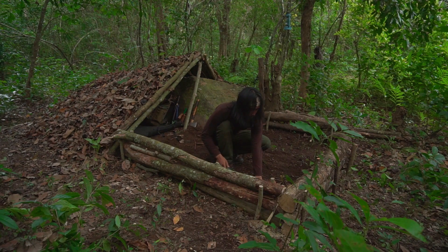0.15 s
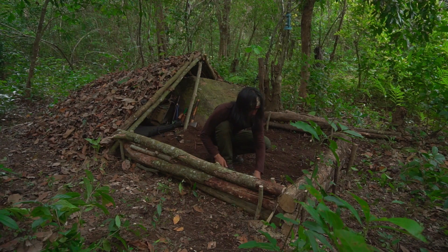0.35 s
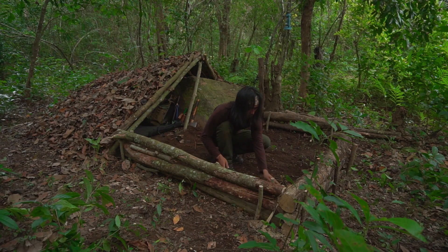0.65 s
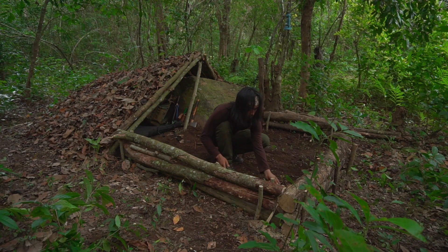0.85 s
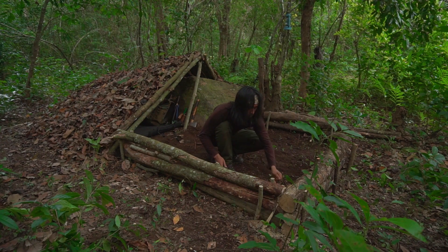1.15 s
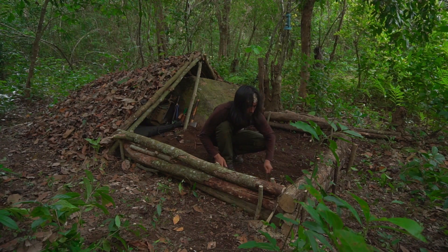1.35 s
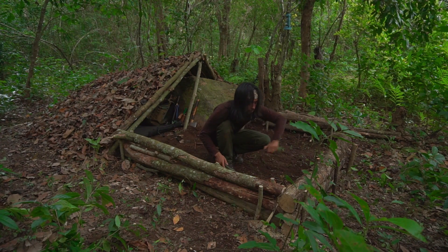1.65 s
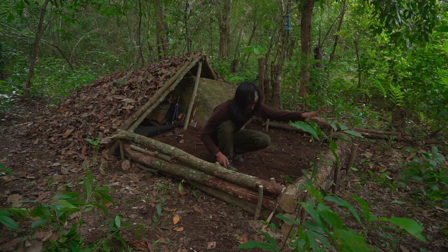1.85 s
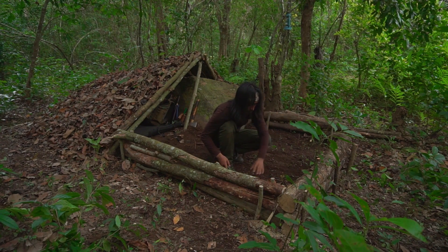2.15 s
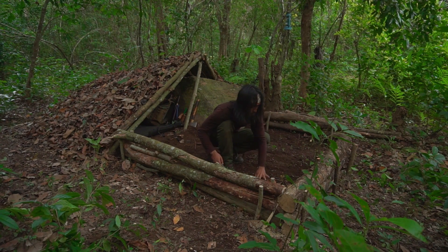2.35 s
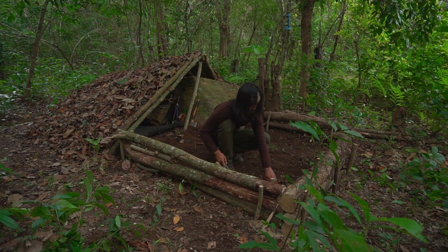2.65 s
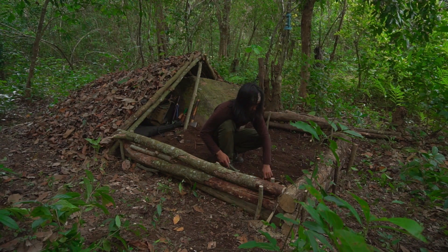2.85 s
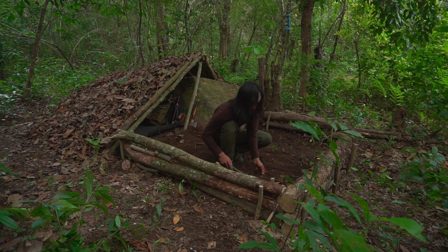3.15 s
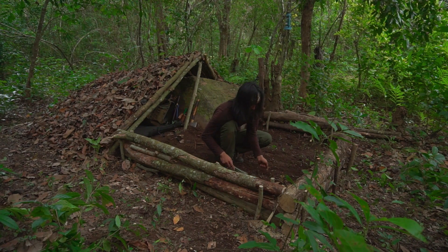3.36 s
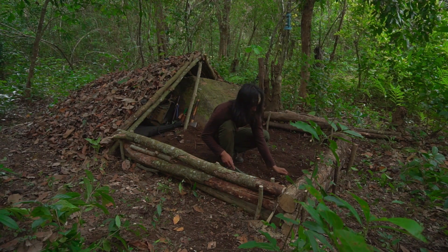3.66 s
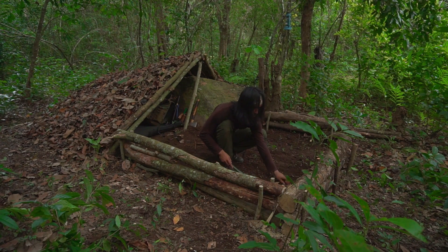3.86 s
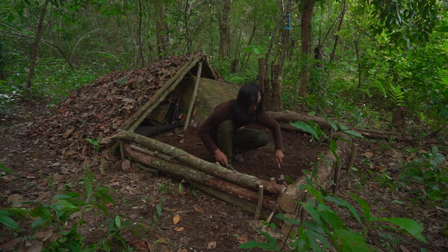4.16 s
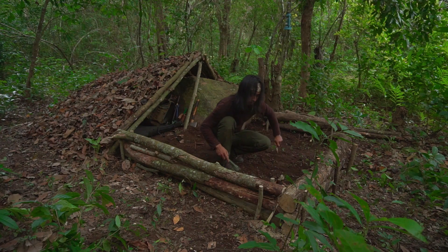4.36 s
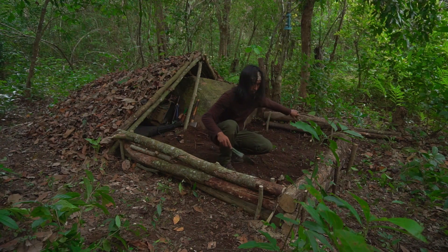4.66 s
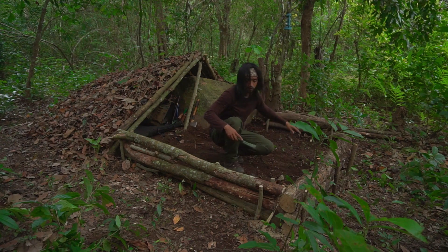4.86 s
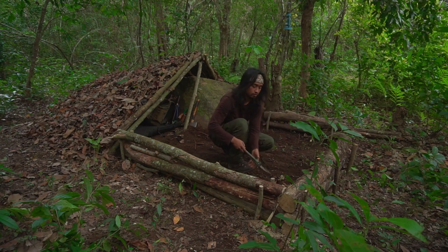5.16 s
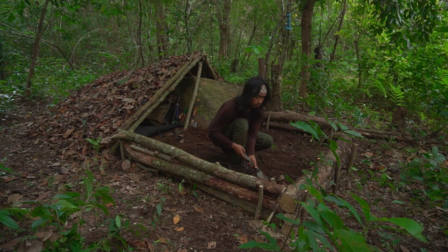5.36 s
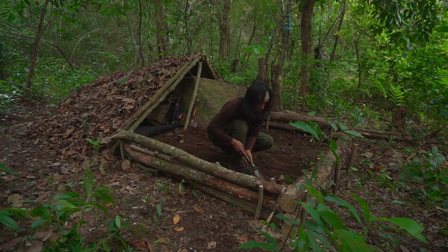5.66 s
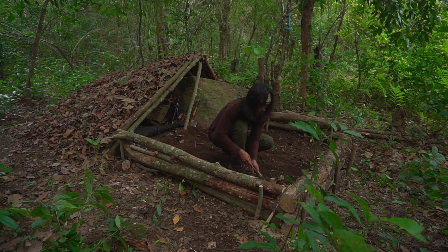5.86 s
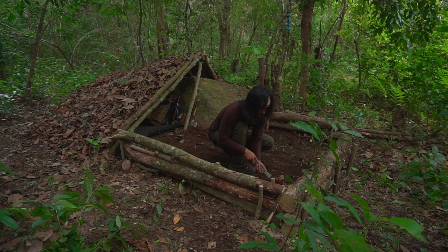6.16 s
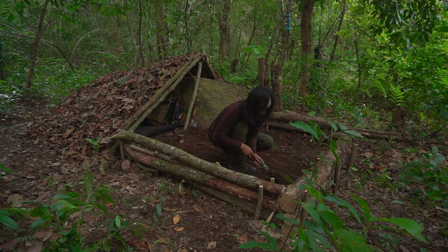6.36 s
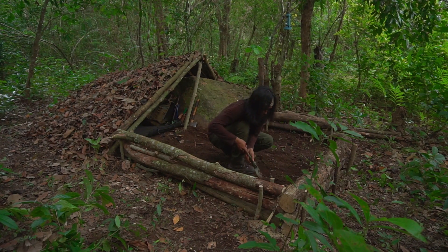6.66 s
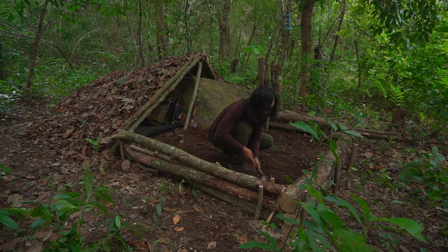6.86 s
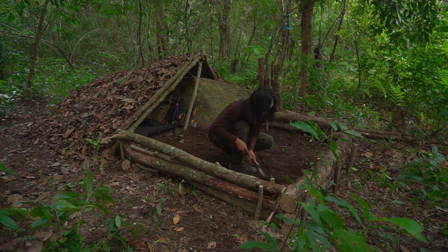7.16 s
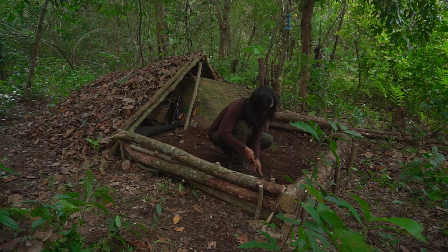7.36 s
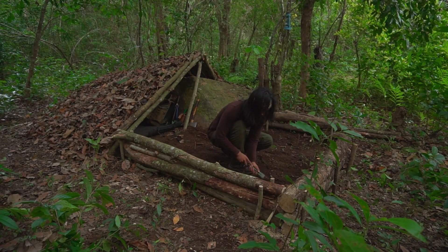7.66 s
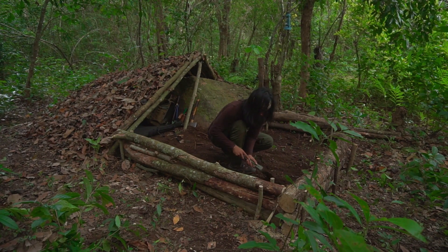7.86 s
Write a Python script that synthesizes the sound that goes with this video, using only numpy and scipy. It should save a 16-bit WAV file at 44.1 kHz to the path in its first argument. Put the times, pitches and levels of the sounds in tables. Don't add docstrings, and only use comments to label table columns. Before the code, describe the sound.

Tropical forest insects trill and a tree frog pulses over a soft stream hiss while hands rustle litter, snap twigs and chop at a root.

```python
import sys
import numpy as np
from scipy import signal
from scipy.fft import rfft, irfft, next_fast_len
from scipy.io import wavfile
from scipy.ndimage import uniform_filter1d

SR = 44100
rng = np.random.default_rng(int(sys.argv[2]) if len(sys.argv) > 2 else 0)


def natural_amplitude(level_db):
    exponent = np.asarray(level_db, float) / 20
    return 10 ** exponent


def wav_record(signal):
    frames = np.transpose(np.atleast_2d(signal))
    bounded = np.clip(frames, -1, 1)
    quanta = np.round(bounded * 32767).astype(np.int16)
    wavfile.write(sys.argv[1], SR, quanta)


N = 353241


def unit(x):
    return x / np.sqrt(np.mean(x ** 2) + 1e-20)


def along(points, hz):
    f, v = np.transpose(points)
    return np.interp(np.log(hz + 1), np.log(f + 1), v)


def curves(rows):
    s, *cols = np.transpose(rows)
    return [np.interp(np.arange(N) / SR, s, c) for c in cols]


def filtered(x, response):
    m = next_fast_len(x.shape[-1] + 8192)
    return irfft(rfft(x, m) * response(np.fft.rfftfreq(m, 1 / SR)), m)[..., :x.shape[-1]]


def resonance(hz, width):
    return lambda f: 1j * f * width / (hz * hz - f * f + 1j * f * width)


def add(track, s, sound):
    start = max(round(s * SR), 0)
    part = track[..., start:start + sound.shape[-1]]
    part += sound[..., :part.shape[-1]]


def notes(s, length, from_hz, to_hz, db, swell, pan_db=0):
    t = np.arange(round(np.max(length) * SR)) / SR
    s, length, from_hz, to_hz, db = (np.reshape(v, (-1, 1)) for v in (s, length, from_hz, to_hz, db))
    u = np.minimum(t / length, 1)
    turns = from_hz * t + (to_hz - from_hz) * t * u / 2 + rng.random(s.shape)
    envelope = np.abs(np.sin(np.pi * u)) ** swell
    wave = natural_amplitude(db + 3) * envelope * np.sin(2 * np.pi * turns)
    at = np.clip(np.round(s * SR).astype(int) + np.arange(len(t)), 0, N)
    sides = (.5, -.5) if np.any(pan_db) else (0,)
    ears = [wave * natural_amplitude(side * np.reshape(pan_db, (-1, 1))) for side in sides]
    return np.array([np.bincount(at.ravel(), ear.ravel(), N + 1)[:N] for ear in ears])


def roughened(x, hz, share):
    flutter = unit(filtered(rng.standard_normal(x.shape), lambda f: 1 / (1 + (f / hz) ** 4)))
    share = np.clip(share, 0, 1)
    return np.sqrt(1 - share) * x + np.sqrt(share) * x * flutter


def rasp(length, hz, width, db, beat, grain_db):
    t = np.arange(round(length * SR)) / SR
    grains = rng.standard_normal(len(t)) * natural_amplitude(grain_db * rng.exponential(size=len(t)))
    teeth = grains * (1 + beat * np.sin(2 * np.pi * 90 * t))
    ring = resonance(hz, width)
    envelope = np.abs(np.sin(np.pi * t / length)) ** 0.45
    return natural_amplitude(db) * unit(filtered(teeth, lambda f: ring(f) ** 2)) * envelope


def snap(db, hz, treble_db, t60_ms, width):
    t = np.arange(SR // 25) / SR
    crack = rng.standard_normal((2, len(t))) * natural_amplitude(-60000 * t / np.clip(t60_ms, 1, 40))
    crack[:, 0] = 4.4
    body, spit = resonance(hz, max(width, 200)), resonance(8600, 6500)
    low = filtered(crack[0], lambda f: body(f) ** 2)
    high = filtered(crack[1], lambda f: spit(f) ** 2)
    return natural_amplitude(db - 2.0) * (low / np.abs(low).max() + natural_amplitude(treble_db + 5.0) * high / np.abs(high).max())


def snap_track(events):
    out = np.zeros(N)
    for s, *sound in events:
        add(out, s + .0006, snap(*sound))
    return out


def trees(x, t60, wet_db):
    t, hop = np.arange(SR // 4) / SR, SR // 4
    out, fade = np.zeros((2, N)), np.hanning(2 * hop)
    padded = np.pad(x, ((0, 0), (hop, 2 * hop)))
    for start in range(-hop, N, hop):
        piece = padded[:, start + hop:start + 3 * hop] * fade
        tail = rng.standard_normal((2, len(t))) * natural_amplitude(-60 * t / t60) * np.minimum(t / 0.0014, 1)
        wet = signal.fftconvolve(piece, tail / np.linalg.norm(tail[0]), axes=1)
        add(out, start / SR, wet[:, max(-start, 0):])
    return x + natural_amplitude(wet_db) * out


# frequency in Hz, level in dB per Hz.
STREAM_SPECTRUM = [(25, -53), (100, -33), (186, -24), (490, -5.5), (815, -3.5), (1500, -3), (2250, -4),
                   (3500, -10.5), (5350, -14), (6900, -16.5), (10900, -23), (13700, -43), (14050, -1.5),
                   (14400, -37)]
# frequency in Hz, left-right likeness from -1 to 1.
STREAM_LIKENESS = [(60, 0.49), (500, 0.6), (1500, 0.61), (4300, 0.45), (5500, 0.13), (8400, 0.14),
                   (10800, 0.17)]


def stream():
    z = signal.stft(rng.standard_normal((2, N)), nperseg=512)[2]
    patches = uniform_filter1d(rng.standard_normal(z.shape[1:]), size=6, axis=0)
    patches = uniform_filter1d(patches, size=14, axis=1)
    pair = signal.istft(z * natural_amplitude(0.75 * unit(patches)), nperseg=512)[1][:, :N]

    def mid_side(hz):
        turn = np.arccos(np.clip(along(STREAM_LIKENESS, hz), -1, 1)) / 2
        return natural_amplitude(along(STREAM_SPECTRUM, hz)) * [np.cos(turn), np.sin(turn)]

    mid, side = filtered(pair, mid_side)
    return natural_amplitude(-41) * unit(np.array([mid + side, mid - side]))


# middle as share of the cycle, length in seconds, start and end in Hz,
# level in dB.
WING_STROKES = [
    (0, 0.014, 6253, 6198, 2),
    (0.43, 0.011, 6143, 6170, 1.5),
    (0.74, 0.009, 6120, 6135, -5.5),
]
# time in seconds, cycles behind a steady beat.
WING_DRIFT = [(0, 0), (.5, -.03), (1.2, -.09), (1.28, .12), (1.7, .06), (2.2, .12), (3, .1), (3.6, -.03),
              (4.02, -.13), (4.1, .12), (4.6, 0), (4.85, -.03), (5.2, .1), (5.7, .3), (6.4, .48),
              (8.02, .9)]


def near_cricket(level_db):
    wing_rate, left_lead_s = 28.3, .0062
    behind, = curves(WING_DRIFT)
    beats = np.flatnonzero(np.diff(np.floor(wing_rate * np.arange(N) / SR - behind))) / SR
    song = np.zeros((1, N))
    for share, length, from_hz, to_hz, db in WING_STROKES:
        chance = rng.standard_normal((len(beats), 3))
        detune = 20 * chance[:, 0]
        start = beats + share / wing_rate - length / 2 + .0006 * chance[:, 1]
        song += notes(start, length + 0 * beats, from_hz + detune, to_hz + detune,
                      db + .9 * chance[:, 2], swell=1.1)
    song = natural_amplitude(level_db + 3) * unit(song[0])
    left = natural_amplitude(-4.5) * np.roll(song, -round(left_lead_s * SR))
    return trees(np.array([left, song]), 0.076, -5.5)


def crowd(hz, spread_hz, length, fall_hz):
    when, chance = rng.random((2, 4000)) * N / SR, rng.standard_normal((2, 2, 4000))
    pitch = hz + spread_hz * chance[0]
    ears = [notes(when[ear], length + 0 * when[ear], pitch[ear] + fall_hz / 2, pitch[ear] - fall_hz / 2,
                  1.5 * chance[1, ear], swell=1.8)[0] for ear in range(2)]
    return unit(np.array(ears))


# pitch in Hz, spread in Hz, stroke in seconds, fall in Hz.
FAR_CRICKETS = [
    (6180, 62, .016, 56),
    (6130, 190, .012, 56),
    (5720, 56, 0.023, 8),
]


def far_chorus(level_db):
    kin, strays, low_kind = (crowd(*kind) for kind in FAR_CRICKETS)
    far = natural_amplitude(level_db + 0.5) * kin + natural_amplitude(0.55 * level_db - 21.5) * strays + natural_amplitude(-60.0) * low_kind
    return far * natural_amplitude([[1], [-1.5]])


# time in seconds, near level in dB, far chorus level in dB.
CRICKET_LEVELS = [(0, -47, -45), (.5, -43.5, -46.5), (1, -43, -48.5), (1.5, -43, -45.5), (2, -44.5, -45.5),
                  (2.5, -43.5, -45), (3, -44, -46), (3.5, -45, -47.5), (4, -45, -47.5), (4.5, -44, -46),
                  (5, -43.5, -44), (5.5, -45, -47), (6, -45, -47.5), (6.6, -50, -43), (6.9, -57, -44),
                  (7.4, -60, -44.5), (8.02, -62, -39.5)]


def crickets():
    near_db, far_db = curves(CRICKET_LEVELS)
    return near_cricket(near_db) + far_chorus(far_db)


# start in seconds, length in seconds, centre in Hz, width in Hz, level in dB.
KATYDID_BUZZES = [
    (0, 0.1, 4800, 500, -49.5),
    (0.802, 0.13, 5030, 900, -49),
    (1.04, 0.12, 5020, 600, -49.5),
    (1.3, .08, 4900, 600, -52),
    (1.565, 0.35, 5050, 1100, -48.5),
    (3.328, .015, 4370, 800, -42),
    (4.57, 0.27, 4660, 1500, -48.5),
    (6.116, 0.15, 5060, 1100, -49.5),
]


def katydid():
    out = np.zeros(N)
    for s, *sound in KATYDID_BUZZES:
        add(out, s, rasp(*sound, beat=.24, grain_db=0))
    return out


# level in dB, one a beat.
PEEP_LEVELS = [-48, -50, -46, -52, -49, -58, -52, -49, -53, -51, -52, -53]
# start in seconds, length in seconds, pitch in Hz, level in dB.
LEVEL_NOTES = [(.077, 0.059, 7050, -52), (0.722, .09, 7070, -54), (6.743, .045, 7080, -51),
               (6.86, .045, 7050, -51), (7.99, .03, 7100, -56), (3.811, 0.066, 6700, -54),
               (4.465, .07, 6665, -59), (5.14, .082, 6710, -53), (5.78, 0.12, 6665, -59),
               (6.45, .058, 6670, -53), (6.569, .043, 6700, -56), (7.168, 0.043, 6725, -52),
               (7.272, 0.039, 6755, -43), (7.823, 0.044, 6750, -52), (7.869, .05, 6755, -43),
               (7.92, .05, 6745, -50), (7.84, .025, 7950, -56)]


def whistling_insects():
    beat = .004 + .6818 * np.arange(len(PEEP_LEVELS))
    peeps = notes(beat, 0.0485, 7230, 6920, PEEP_LEVELS, swell=0.55)
    s, length, hz, db = np.transpose(LEVEL_NOTES)
    sag_hz = 30
    return peeps + notes(s, length, hz + sag_hz / 2, hz - sag_hz / 2, db, swell=0.52, pan_db=-6)


# first and last croak in seconds, first and last level in dB.
CROAK_TRAINS = [
    (0.02, 0.606, -39, -38),
    (2.61, 3.3, -39.5, -37.5),
    (4.783, 5.198, -41, -38),
    (6.122, 6.187, -37, -40),
    (6.251, 7.019, -39.5, -39.5),
]
# lag in seconds, length in seconds, start and end in Hz, level in dB.
CROAK_PARTS = [
    (0, .016, 4020, 4050, -17),
    (.011, .02, 4150, 3980, -9),
    (.01, .04, 3760, 3780, -12),
    (.018, .024, 3980, 3820, -13.5),
    (.032, .022, 4080, 3960, -14.5),
    (.04, .022, 3820, 3700, -17),
    (.055, .025, 4000, 4040, -26),
]


def tree_frog():
    starts, levels = [], []
    for first, last, first_db, last_db in CROAK_TRAINS:
        count = round((last - first) / .085) + 1
        starts.append(np.linspace(first, last, count))
        levels.append(np.linspace(first_db, last_db, count))
    s, db = np.hstack(starts), np.hstack(levels)
    chance = rng.standard_normal((len(s), 2))
    s, db = s + .002 * chance[:, 0], db + .5 * chance[:, 1]
    frog = np.zeros((2, N))
    for lag, length, from_hz, to_hz, part_db in CROAK_PARTS:
        detune = rng.normal(0, 25.0, len(s))
        frog += notes(s - .008 + lag, length + 0 * s, from_hz + detune, to_hz + detune,
                      db + part_db, swell=0.34)
    return roughened(frog, 220, .25)


# start in seconds, length in seconds, start
# and end in Hz, level in dB.
HOARSE_NOTES = [(1.574, .018, 4400, 3850, -47), (1.582, .1, 3880, 4010, -49),
                (1.707, .018, 4600, 3860, -48.5), (1.72, 0.074, 3810, 4050, -46),
                (1.8, 0.11, 3880, 3960, -49.5), (0, .045, 4080, 4020, -47),
                (.05, .095, 4000, 3970, -50), (4.55, .035, 3840, 3810, -46),
                (4.59, .1, 3820, 3820, -49), (4.711, .07, 3830, 3740, -50),
                (4.82, .07, 3800, 3800, -51), (6.18, .14, 3930, 3880, -59)]


def hoarse_callers():
    return roughened(notes(*np.transpose(HOARSE_NOTES), swell=0.38), 200, .5)


# middle in seconds, seconds to fall 10 dB,
# crackle in dB, body in dB.
LEAF_SWEEPS = [(0, 0.25, -63, 12), (.88, 0.02, -52, 0), (1.3, 0.14, -58.5, 7.5), (1.52, 0.02, -51, -14),
               (2.45, 0.09, -49, -9), (2.74, 0.03, -53, 2), (3.3, 0.2, -56, -4), (3.41, 0.18, -51.5, -4),
               (4.68, 0.1, -59.5, 6), (5.93, 0.06, -49.5, -5), (5.97, 0.35, -54, -4)]
# start in seconds, hold in seconds,
# fade in dB a second, crackle in dB, body in dB.
SOIL_DIGS = [
    (3.47, 0.033, 700, -43, -1),
    (3.518, .04, 400, -49, 4),
    (3.565, 0.04, 900, -44.5, 0),
    (3.612, 0.04, 50, -52.5, 2),
    (4.416, .065, 300, -51, -1),
    (6.409, .01, 90, -46, -6),
    (6.81, .07, 110, -50.5, 0),
    (7.363, 0.054, 140, -45.5, -1),
]


def stir():
    t = np.arange(N) / SR
    moves = [(-63.5 + 0 * t, 3)]
    for s, width, db, body_db in LEAF_SWEEPS:
        moves.append((db - 10 * np.abs(t - s) / width, body_db))
    for s, hold, fade, db, body_db in SOIL_DIGS:
        rise = 2000 * np.maximum(s - t, 0)
        moves.append((db - rise - fade * np.maximum(t - s - hold, 0), body_db))
    power = [(natural_amplitude(2 * db), natural_amplitude(2 * body_db)) for db, body_db in moves]
    return np.sqrt(sum(p for p, _ in power)), np.sqrt(sum(p * body for p, body in power))


# frequency in Hz, level in dB per Hz.
GRIT_SPECTRUM = [(200, -80), (1200, -30), (2500, -16), (3100, -3.5), (3800, -1.5), (4600, -3.5), (5500, -9),
                 (7500, -5), (9000, -8), (11000, -7.5), (16000, -21)]


def rustle():
    crackle, weight = stir()
    sizes = roughened(natural_amplitude(1.1 * rng.exponential(size=N)), 120, .02)
    cracks = (rng.standard_normal(N) + 0.84 * rng.standard_normal((2, N))) * sizes
    grit = filtered(cracks, lambda f: natural_amplitude(along(GRIT_SPECTRUM, f)))
    treble = filtered(grit[0], lambda f: (f > 8000) & (f < 10800))
    grit /= np.sqrt(np.mean(treble ** 2))
    body = filtered(grit, lambda f: 1 / (1 + (f / 5500) ** 4))
    stumble = unit(filtered(rng.standard_normal(N), lambda f: 1 / (1 + (f / 70) ** 2)))
    lumps = unit(natural_amplitude(.5 * stumble))
    return crackle * (grit - body) + weight * lumps * body


def without_bass(x):
    return filtered(x, lambda f: (1j * f / (1j * f + 260)) ** 4)


# frequency in Hz, level in dB, t60 in seconds.
LOG_MODES = [
    (655, -15.5, 0.048),
    (900, -5.5, 0.015),
    (1046, -1.5, 0.013),
    (1460, -1, 0.012),
    (2000, 4, 0.0105),
    (3080, -9, 0.013),
    (4100, -6, 0.009),
    (5600, -11, .007),
    (8890, -13.5, 0.008),
]


def blow(crack_db, stick_db, hollow_db):
    t = np.arange(SR // 8) / SR
    ring = 0
    for hz, db, t60 in [*LOG_MODES, (2430, stick_db, .028)]:
        decay = natural_amplitude(db + 0.99 * rng.standard_normal() - 60 * t / t60)
        ring = ring + decay * (1 - np.exp(-t * hz * 1.44)) * np.sin(2 * np.pi * hz * t)
    hollow_hz, hollow_t60, hollow_rise_s = 458, .058, .004
    late_rise = 1 - np.exp(-(t / hollow_rise_s) ** 2)
    ring += natural_amplitude(hollow_db - 60 * t / hollow_t60) * late_rise * np.sin(2 * np.pi * hollow_hz * t)
    crack = filtered(rng.standard_normal(len(t)), resonance(4300, 8300))
    return ring + natural_amplitude(crack_db - 60 * t / 0.015) * crack


# time in seconds, peak in dB, crack in dB, ring of the stick in dB, hollow in dB.
STICK_KNOCKS = [
    (1.2412, -17, -12, 1, -4),
    (1.26, -21, -17, -12, -2.5),
    (1.2875, -5.5, -12, -26, -5),
]


def knocks():
    out = np.zeros(N)
    for s, db, crack_db, *rings_db in STICK_KNOCKS:
        add(out, s, natural_amplitude(db - 4.0) * blow(crack_db + 4.0, *rings_db))
    return without_bass(out)


# time in seconds, peak in dB, centre in Hz, treble in dB, t60 in milliseconds.
LOUD_BREAKS = [
    (4.4152, -14.5, 3600, -10, 16),
    (4.4156, -24, 1700, -25, 12),
    (4.422, -21, 3900, -9, 23),
    (4.5407, -4, 3900, -36, 1.4),
    (4.541, -14, 1100, -25, 2.7),
    (4.542, -22, 2200, -25, 15),
    (1.2869, -10.5, 1500, -24, 1.7),
]


def breaks():
    return snap_track([(*row, 4000) for row in LOUD_BREAKS])


# time in seconds, level in dB, pitch in Hz.
SOIL_PUSHES = [
    (1.287, -66, 90),
    (4.41, -70, 108),
    (4.54, -79, 80),
    (5.0, -52, 244),
    (6.27, -76, 90),
    (6.87, -68, 120),
    (7.36, -68, 90),
]


def ground():
    s, db, hz = np.transpose(SOIL_PUSHES)
    return notes(s - .004, 2.4 / hz, hz, 0.88 * hz, db, swell=1.6)


# time in seconds, peak in dB, centre in Hz, treble in dB.
SMALL_SNAPS = [(1.4892, -35, 2303, -16), (1.5534, -32, 2230, -25), (1.587, -24, 3950, -22),
               (2.4254, -31, 2330, -14), (2.464, -26.5, 3770, -5), (2.519, -32, 2290, -16),
               (2.69, -33, 3790, -19), (2.9637, -25, 4030, -7), (3.1497, -28, 3800, -21),
               (3.268, -33, 2480, 4), (3.3356, -24, 3707, -19), (3.3854, -29, 2200, -17),
               (3.4724, -33, 3590, -8), (3.625, -26, 4080, -18), (3.703, -32, 3780, -20),
               (3.9234, -32, 2300, -6), (3.9564, -31, 2660, -13), (4.4484, -38, 5000, 11),
               (4.6384, -30, 3870, -17), (5.8654, -38, 2380, -2), (5.927, -29, 2220, 3),
               (6.4092, -30, 2410, -5), (6.8032, -29, 6000, 8), (6.813, -30, 6000, 6),
               (6.8687, -25, 3530, -13), (6.8906, -25, 2330, -11), (7.3945, -28, 2300, -18),
               (7.4, -27, 2400, -18), (7.417, -28, 2800, -14), (7.388, -28, 2300, -18),
               (7.41, -29, 2000, -18), (3.4343, -35, 3260, 0), (5.836, -42, 2400, -3),
               (5.9069, -38, 2400, -2), (3.362, -38, 3000, 2)]


def snaps():
    t60_ms, breadth = 14, 1.6
    return snap_track([(*row, t60_ms, breadth * row[2]) for row in SMALL_SNAPS])


# start in seconds, length in seconds, start and end in Hz, level in dB.
FAR_BIRD_NOTES = [
    (2.278, .026, 1620, 1620, -43),
    (2.304, .022, 1630, 1620, -48),
    (2.326, .05, 1625, 1600, -39),
    (2.465, 0.04, 1620, 1610, -48),
]


def far_bird():
    return notes(*np.transpose(FAR_BIRD_NOTES), swell=0.44, pan_db=10)


def callers():
    whistles = roughened(whistling_insects() + far_bird(), 115, .16)
    return trees(whistles + hoarse_callers() + tree_frog() + katydid(), 0.22, -4)


# start in seconds, t60 in seconds, centre in Hz, width in Hz, level in dB.
SOIL_SLIDES = [
    (2.44, .4, 2500, 2000, -44),
    (4.42, .3, 2200, 1800, -44),
    (5.925, 0.38, 2100, 1200, -39.5),
    (6.41, .4, 2400, 1800, -43),
    (6.86, .3, 2520, 1800, -39),
    (7.376, 0.47, 2300, 1900, -35),
]


def scuffs():
    out, t = np.zeros((2, N)), np.arange(SR // 4) / SR
    for s, t60, hz, width, db in SOIL_SLIDES:
        clods = rng.standard_normal(len(t)) + .5 * rng.standard_normal((2, len(t)))
        ring = resonance(hz, width)
        wash = roughened(unit(filtered(clods, lambda f: ring(f) ** 2)), 150, 0.05)
        add(out, s, natural_amplitude(db - 60 * t / t60) * np.minimum(t / 0.0069, 1) * wash)
    return out


# start in seconds, length in seconds, centre in Hz,
# width in Hz, level in dB.
FINGER_SCRAPES = [(3.457, .036, 12500, 2500, -41), (3.46, .04, 15000, 2000, -42),
                  (3.468, .04, 7700, 1700, -42), (3.474, .032, 3700, 1200, -46),
                  (3.518, .042, 7200, 1400, -43.5), (3.52, .034, 3900, 800, -44),
                  (3.566, .042, 10700, 1500, -48), (3.57, .02, 3200, 800, -49),
                  (3.612, .045, 3900, 900, -44), (3.622, .03, 10300, 1500, -52),
                  (4.475, .025, 8700, 1800, -54), (5.927, .04, 9300, 2500, -55)]


def scrapes():
    out = np.zeros(N)
    for s, *sound in FINGER_SCRAPES:
        add(out, s, rasp(*sound, beat=0, grain_db=3.0))
    return out


# time in seconds, peak in dB, main mode in Hz, weaker mode in Hz, treble in dB.
TWIG_TICKS = [
    (6.2628, -16, 2970, 4030, -14),
    (6.795, -20, 3650, 4420, -2),
    (7.3712, -20, 2950, 2240, -26),
    (7.7895, -29, 3100, 2700, -22),
]


def ticks():
    events = []
    for s, db, low_hz, high_hz, treble_db in TWIG_TICKS:
        for hz, part_db in ((low_hz, 0), (high_hz, -4.5)):
            events.append((s, db + part_db, hz, treble_db, 6.8, 490))
    return snap_track(events)


# time in seconds, level in dB.
CHOP_FORCE = [
    (7.3517, -30),
    (7.3521, -15),
    (7.3538, -14.5),
    (7.3558, -23),
    (7.3573, -13.5),
    (7.361, -24),
    (7.364, -39),
    (7.372, -46),
]
# frequency in Hz, width in Hz, energy in dB at first and second bite.
BLADE_MODES = [(474, 32, -9, -8), (1310, 110, 0, -24), (1950, 290, 0, -16), (2300, 190, 3, -3),
               (3000, 450, -3, -8), (3800, 740, -3, -2), (4500, 450, -6, 0), (5700, 440, -14, -13),
               (8300, 1900, 3, 1), (10300, 1700, -22, 0), (13500, 3000, -11, -2)]


def chop():
    out = np.zeros(N)
    t = np.arange(CHOP_FORCE[0][0], CHOP_FORCE[-1][0], 1 / SR)
    fibres = rng.standard_normal(len(t)) * natural_amplitude(np.interp(t, *np.transpose(CHOP_FORCE)))
    second_bite_s = 7.356
    for bite, part in enumerate((t < second_bite_s, t >= second_bite_s)):
        torn = np.pad(fibres * part, (0, SR // 10))
        for k, (hz, width, *db) in enumerate(BLADE_MODES):
            ring = filtered(torn, resonance(hz, width))
            sign = (-1) ** max(k, 1)
            add(out, t[0], sign * natural_amplitude(db[bite]) * ring / np.linalg.norm(ring))
    return without_bass(out)


def scene():
    wood = knocks() + breaks() + snaps() + ticks() + chop()
    hand = wood + rustle() + scuffs() + scrapes() + ground()
    return stream() + crickets() + callers() + trees(hand, 0.05, -12.0)


def band_limit(x):
    return signal.sosfilt(signal.butter(12, 14900, fs=SR, output="sos"), x)


# frequency in Hz, level in dB.
TREBLE_EDGE = [(60, 2.5), (11000, -2), (11250, -35), (13400, -34), (14900, -33), (16500, -60)]
# frequency in Hz, left over right in dB.
PORT_LEVELS = [(100, 0.5), (500, -2), (1200, -5.5), (2900, -6.5), (4500, -5), (9800, -4.5)]
# frequency in Hz, lead of the left in radians.
PORT_PHASES = [(100, .2), (500, .68), (1400, .9), (2200, .6), (4500, .35), (7400, 0), (10500, -.6)]


def record(dry):
    sign = np.array([[.5], [-.5]])

    def ports(hz):
        level = natural_amplitude(along(TREBLE_EDGE, hz) + sign * along(PORT_LEVELS, hz))
        return level * np.exp(1j * sign * along(PORT_PHASES, hz))

    return band_limit(filtered(dry, ports))


dry = scene()
out = record(dry)
wav_record(out)
```